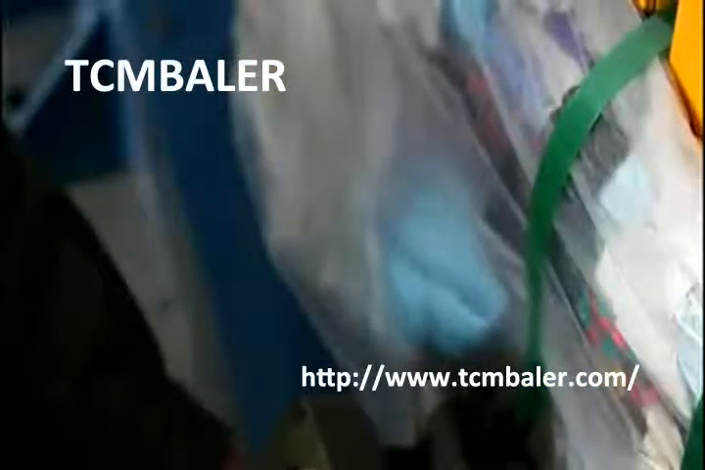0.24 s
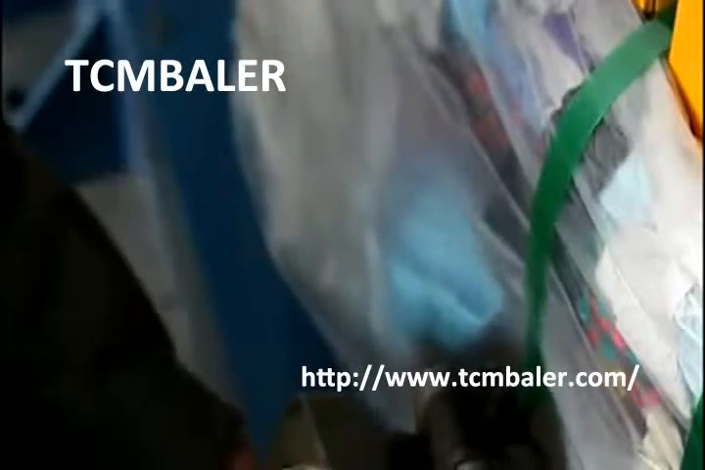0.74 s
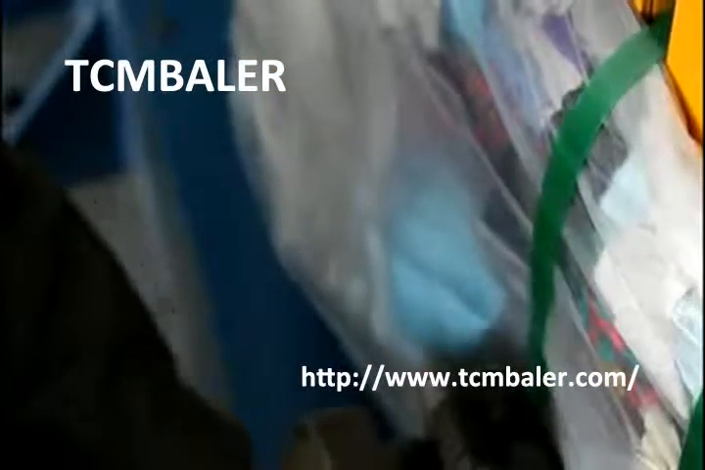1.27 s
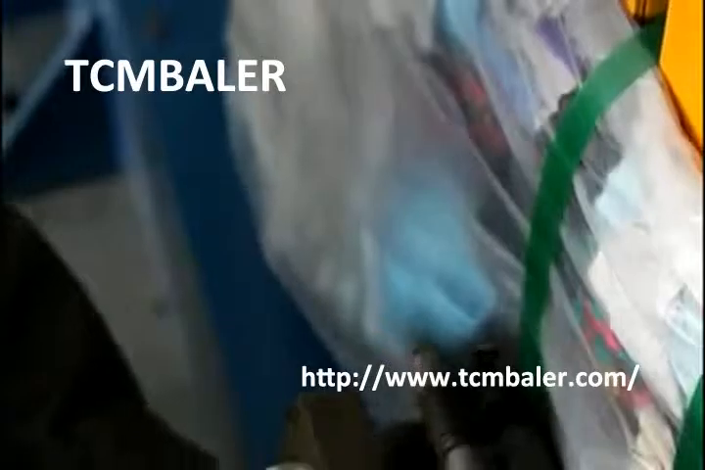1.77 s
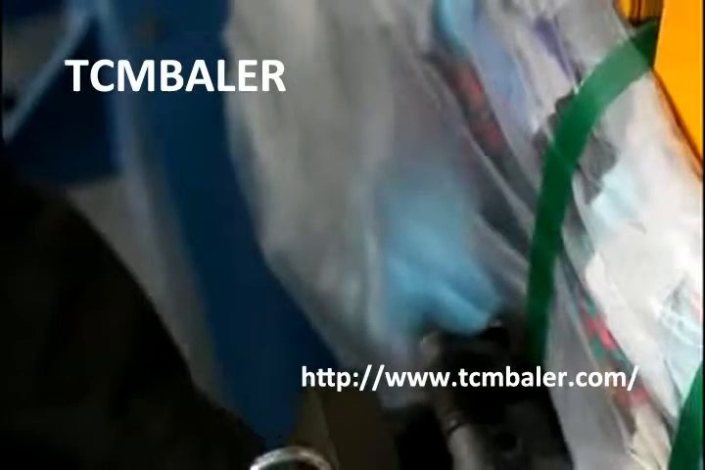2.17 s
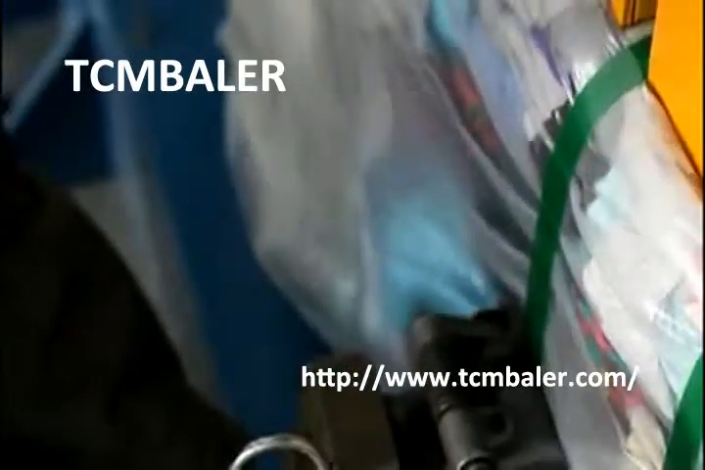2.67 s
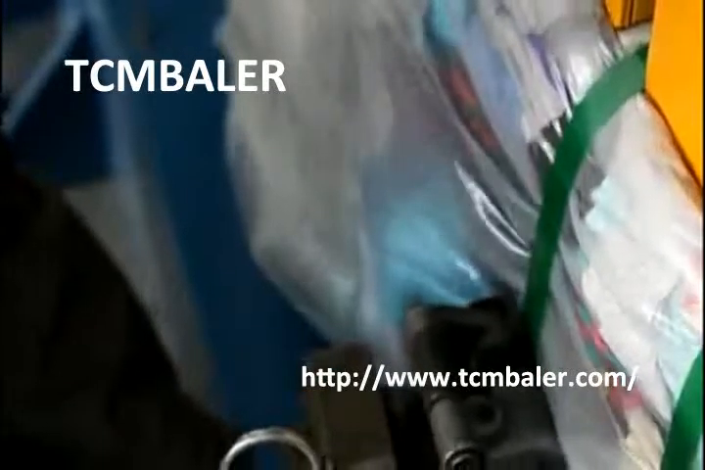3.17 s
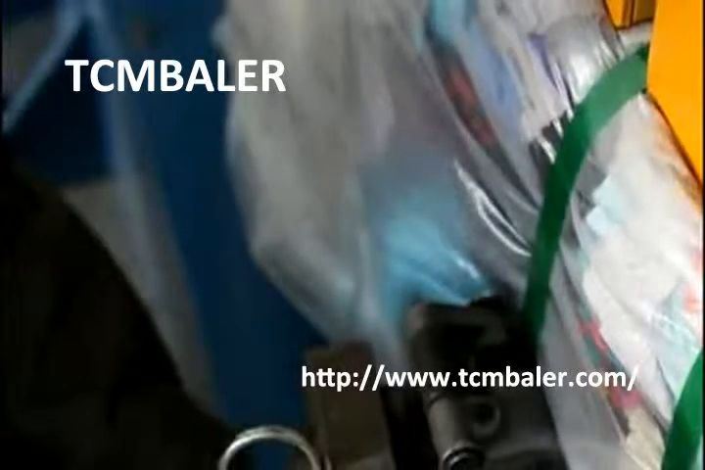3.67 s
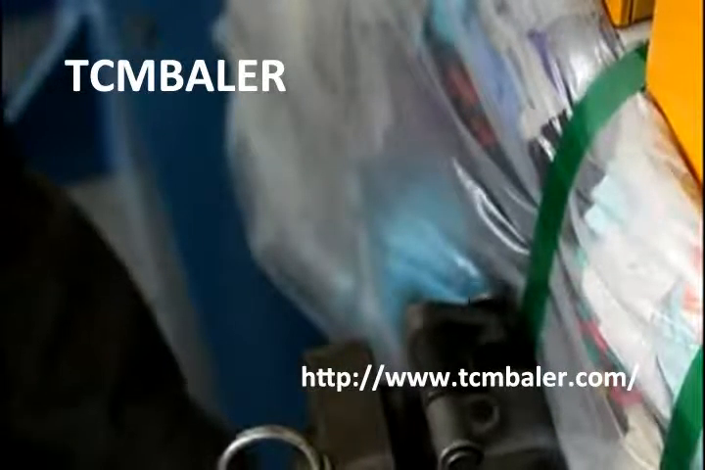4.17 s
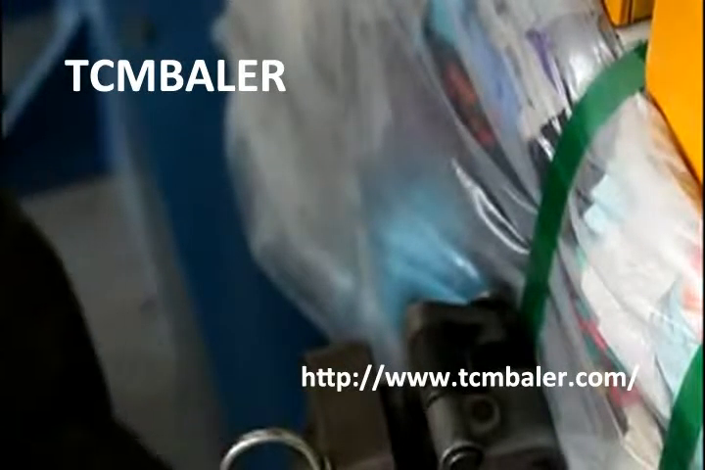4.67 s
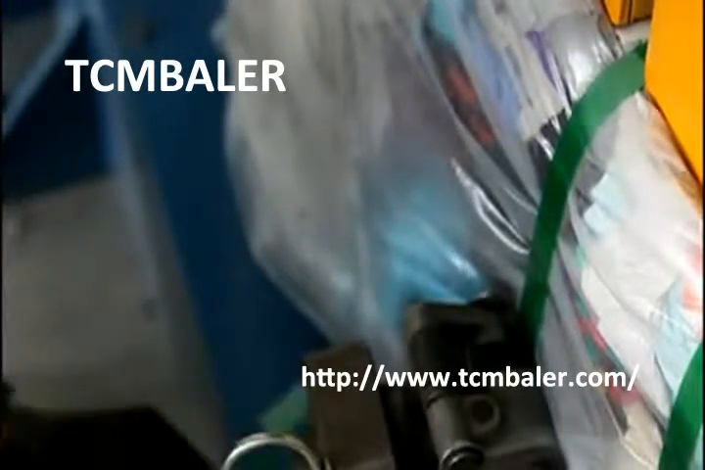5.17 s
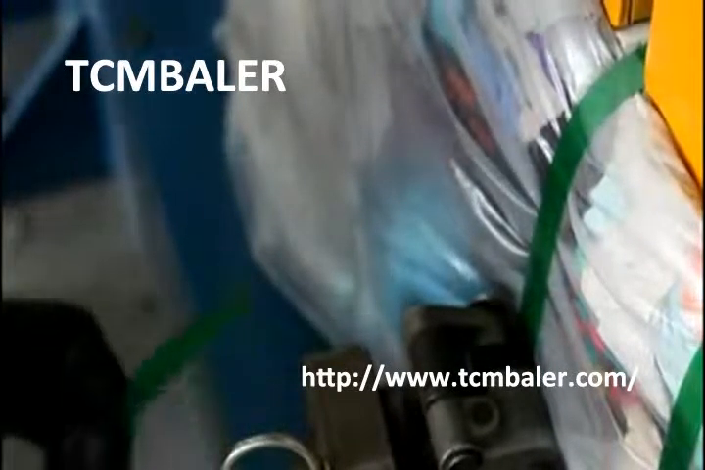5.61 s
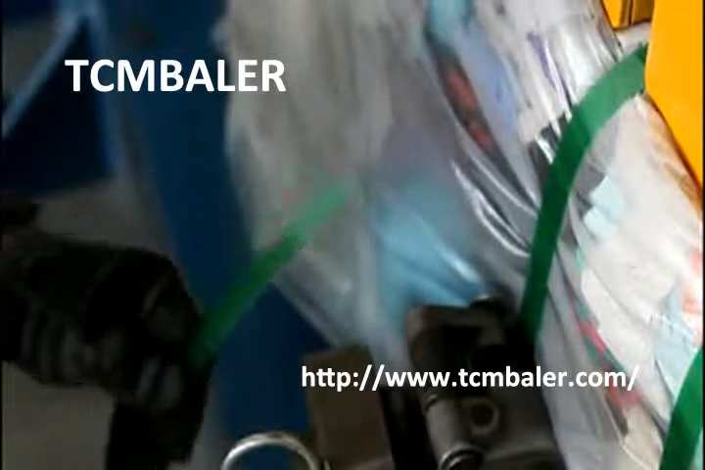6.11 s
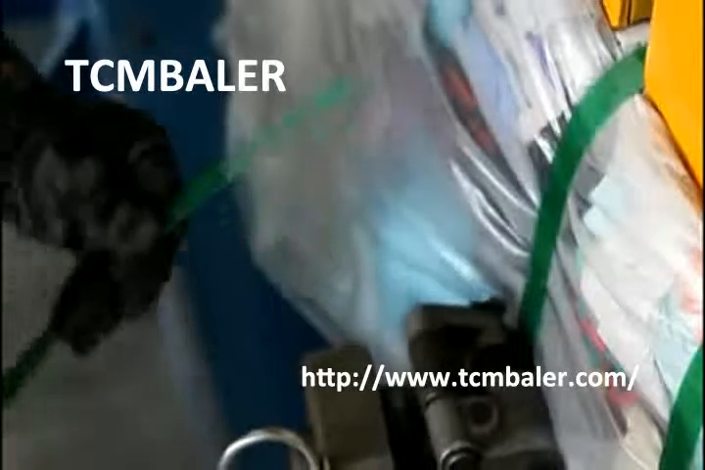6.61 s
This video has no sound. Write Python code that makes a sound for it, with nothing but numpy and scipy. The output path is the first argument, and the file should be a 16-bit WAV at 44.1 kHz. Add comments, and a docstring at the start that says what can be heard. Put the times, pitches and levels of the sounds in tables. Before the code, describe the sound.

A short rush of air and a clack start a handheld pneumatic strapping tool, close to the microphone in a factory. Its motor whines in a strong hiss of exhaust, sinking in pitch as the plastic strap tightens round a bale, until it stalls. After a second of softer rushing air, a lever clacks sharply and the tool's friction welder sets in with a harsh, rasping buzz that lasts to the end.

```python
"""A short rush of air and a clack, then a motor whines close by in a jet of exhaust air: a handheld
pneumatic strapping tool is closing a plastic strap round a bale in a factory. Each vane of the motor
releases a puff, so the pitch follows the rotor, sinking as the strap tightens until it stalls.
A lever clacks and the friction welder buzzes: its shoe knocks to and fro, a periodic force that
excites the housing and the clamped strap. Turbulent air rushes behind it all."""
import sys
import numpy as np
from scipy import signal
from scipy.fft import rfft, irfft
from scipy.io import wavfile
from scipy.ndimage import uniform_filter1d

SR = 44100
rng = np.random.default_rng(int(sys.argv[2]) if len(sys.argv) > 2 else 0)


def to_wav(s):
    """Save 16-bit WAV."""
    ch = np.atleast_2d(s).T  # columns
    pcm = np.round(np.clip(ch, -1, 1) * 32767)  # PCM
    wavfile.write(sys.argv[1], SR, pcm.astype(np.int16))


N = 302085
TIME = np.arange(N) / SR
BINS = np.fft.rfftfreq(N, 1 / SR)


# Rotor speed under the growing load: time_s, vane_rate_hz
LOADED_SPEED = [(0.56, 881.1), (1.02, 876.2), (1.57, 855.1), (1.63, 859.0), (2.13, 834.7), (2.67, 824.8),
                (3.02, 812.0), (3.33, 750.7), (3.46, 679.8)]
MOTOR_START_S, SPIN_UP_S, STALL_S = .444, .023, 3.46

def tension_motor():
    """Siren principle: vanes chop the air into puffs, whose rate sets the pitch and falls with load."""
    running_s = np.maximum(TIME - MOTOR_START_S, 0)
    vane_hz = curve(LOADED_SPEED) * (1 - np.exp(-running_s / SPIN_UP_S))
    angle = 2 * np.pi * np.cumsum(vane_hz * (1 + .0018 * wander(73))) / SR
    return reverberate(vane_whine(vane_hz, angle) + exhaust_jet(angle), t60_s=.5, wet_db=-18)


# Strong partials of the puffs, ahead of the port: harmonic, level_db
STRONG_PARTIALS = [(1, -44.5), (2, -49.5), (3, -50), (4, -39), (5, -42.5), (6, -48.5), (7, -43.5)]
# Weak upper partials: harmonic, relative_level_db
WEAK_PARTIALS = [(8, 8.5), (9, -11), (10, -8.5)]
# Resonances and dips of the exhaust port: centre_hz, width_hz, gain_db
PORT_RESONANCES = [(760, 220, 12.5), (1507, 82, 13), (1621, 45, -10), (1683, 234, 14.5), (2555, 13, 9.1),
                   (2600, 15, 6.5), (3316, 130, 9.5), (3354, 45, -14.5), (3440, 25, -17), (3830, 115, -11),
                   (4201, 68, 8), (4304, 61, 8.5), (4406, 43, 9), (5150, 79, 8), (5490, 90, 12),
                   (6095, 250, 10)]
# Resonances of the motor casing: centre_hz, width_hz, gain_db
CASING_RESONANCES = [(7570, 82, 20.5), (7870, 280, 16.5), (6120, 180, 7)]

def vane_whine(vane_hz, angle):
    """Source and filter: harmonics swell and fade as they glide through fixed resonances."""
    near_stall = np.exp(np.minimum(TIME - STALL_S, 0) / .16)
    stutter_db, dulling_db_per_harmonic = 7, 1.8

    def partial(k):
        """Amplitude modulation: turbulence shakes high partials most; near stall they stutter and fade."""
        strain_db = near_stall * (k > 1) * (stutter_db * wander(19) - dulling_db_per_harmonic * k)
        flutter_db = (1.12 + .17 * k) * wander(41)
        return amp(flutter_db + strain_db) * np.cos(k * angle + 2 * np.pi * rng.random())

    strong = sum(amp(db) * resonance(PORT_RESONANCES, k * vane_hz) * partial(k)
                 for k, db in STRONG_PARTIALS)
    weak = sum(amp(db + 2 * wander(7.5)) * partial(k) for k, db in WEAK_PARTIALS)
    weak = shaped(weak, resonance(CASING_RESONANCES))
    return (np.sqrt(2) * strong + amp(-39) * weak) * gate(.453, STALL_S, .075, .022)


# Spectrum of exhaust air: frequency_hz, gain_db
JET_SPECTRUM = [(400, -25.5), (1300, -22), (2200, -16.5), (2800, -12), (3300, -9), (3900, -7), (4700, -7),
                (5500, -3.5), (6200, 1), (7000, 1), (7700, -1), (8200, -15), (9000, -15.5), (10200, -25.5)]

def exhaust_jet(angle):
    """Jet noise: turbulence throbs at the vane rate and surges until the rotor is up to speed."""
    surge_db = 4 * np.clip((.53 - TIME) / .015, 0, 1)
    puffs = rng.standard_normal(N) * (1 + .23 * np.cos(angle)) * amp(.59 * wander(60))
    muffler = resonance([(3030, 57, 2.3), (7380, 250, 3), (8340, 95, 10.1), (9300, 40, 8.7)])
    jet = shaped(puffs, colour(JET_SPECTRUM) * muffler)
    return jet * amp(-28.5 + surge_db) * gate(.41, 3.455, .019, .011)


# Speed of the welding shoe: time_s, stroke_rate_hz
SHOE_SPEED = [(4.36, 102.8), (4.41, 104.4), (4.45, 102.9), (4.6, 113.5), (4.92, 119.9), (5.02, 120.8),
              (5.24, 127.4), (5.56, 131.0), (5.7, 131.6), (6.03, 125.3), (6.59, 125.5), (6.75, 125.0)]
# Unevenness of the strokes, easing as the strap melts: time_s, roughness_fraction
SHOE_ROUGHNESS = [(4.34, .74), (4.6, .58), (5.08, .52), (5.35, .28), (5.8, .27), (5.97, .48), (6.3, .25),
                  (6.85, .27)]
WELD_START_S = 4.34

def friction_welder():
    """Forced vibration: a reciprocating shoe drives strap and housing, hardest on the cold strap."""
    stroke_hz, roughness = curve(SHOE_SPEED), curve(SHOE_ROUGHNESS)
    coldness = np.exp(-np.maximum(TIME - WELD_START_S, 0) / .24)
    force = amp(-26 + 2.5 * coldness)
    # A dry strap grabs, so the strokes come unevenly.
    angle = 2 * np.pi * np.cumsum(stroke_hz) / SR + .021 * roughness * wander(90)
    # Dispersion: paths through the metal delay each partial differently and smear the knock.
    harmonics = np.arange(1, 84)
    phases = np.cumsum(1.7 * rng.standard_normal(len(harmonics))) - .024 * harmonics ** 2
    singing, singing_power = strap_singing(stroke_hz, angle, phases)
    # Knocks and rasp share the rest of the stroke's power.
    remainder = np.sqrt(np.maximum(force ** 2 - singing_power, force ** 2 / 10))
    buzz = remainder * np.sqrt(1 - roughness ** 2) * shoe_knocks(angle, harmonics, phases)
    rasp = remainder * roughness * strap_rasp(angle)
    strokes = (singing + buzz) * amp(1.07 * roughness * wander(120))
    return reverberate(strokes + rasp, t60_s=.2, wet_db=-18) * gate(WELD_START_S, 7, .014, .01)


# Stroke partials that drive the strap: harmonic, level_db
SINGING_PARTIALS = [(9, -46.5), (13, -44), (15, -42), (21, -44), (23, -44), (25, -46), (27, -44),
                    (29, -44.5)]
# Resonances and dips of the clamped strap: centre_hz, width_hz, gain_db
STRAP_RESONANCES = [(1034, 232, 4.5), (1426, 36, 8.5), (1632, 23, -5.2), (1750, 386, 7.5), (1942, 42, -3.6),
                    (2667, 192, 9.3), (2886, 21, 3.7), (3012, 240, -5.2), (3164, 135, 7.2),
                    (3288, 54, -4.1), (3349, 240, 4.4), (3650, 39, -7.3), (3749, 69, 9.2)]
# Passing resonance late in the weld: peak_s, spread_s, centre_hz, width_hz, gain_db
LATE_RESONANCE = (6.4, .25, 2740, 420, 5.5)
MELT_S, MELT_DB_PER_S = 6.52, 11

def strap_singing(stroke_hz, angle, phases):
    """Resonance: a few partials sing out as they meet the strap's modes, and fade once it melts."""
    peak_s, spread_s, centre_hz, width_hz, gain_db = LATE_RESONANCE
    late_mode = [(centre_hz, width_hz, gain_db * np.exp(-((TIME - peak_s) / spread_s) ** 2))]
    singing = power = 0
    for k, db in SINGING_PARTIALS:
        strength = amp(db) * resonance(STRAP_RESONANCES, k * stroke_hz)
        singing += strength * resonance(late_mode, k * stroke_hz) * np.cos(k * angle + phases[k - 1])
        power += strength ** 2
    melt_fade = amp(-MELT_DB_PER_S * np.maximum(TIME - MELT_S, 0))
    return np.sqrt(2) * singing * melt_fade, power


# Spectrum of the knocks: frequency_hz, gain_db
KNOCK_SPECTRUM = [(125, -34), (375, -10), (630, 1), (880, -1), (1150, 3), (1900, 3), (2700, 3), (3500, .5),
                  (4700, -.5), (6000, -2.5), (7550, -3.5), (8000, -12), (9500, -20), (10500, -32)]
# Resonances and dips of the tool's housing: centre_hz, width_hz, gain_db
HOUSING_RESONANCES = [(1300, 110, -6), (1430, 90, 4), (1780, 200, 7), (2170, 190, -9), (2450, 120, 3),
                      (2790, 60, -4), (3000, 70, -4), (3130, 70, 6), (3420, 70, 7), (3510, 60, 4),
                      (3640, 80, -6), (3745, 55, 3), (4060, 160, 4), (4260, 90, -5), (4530, 80, 7),
                      (4660, 70, 5), (4865, 90, 10), (5100, 150, -4), (5260, 60, 4), (6150, 140, 5),
                      (6770, 100, 5), (7580, 110, 6)]

def shoe_knocks(angle, harmonics, phases):
    """Half-wave symmetry: opposite knocks at the two ends of a stroke favour odd harmonics."""
    # The contact shifts as the strap softens, so the upper partials swell and fade.
    drift_times_s = np.linspace(4.3, 6.9, num=14)
    depth_db = 3.2 * np.minimum(harmonics / 40, 1)
    drifts_db = depth_db[:, None] * rng.standard_normal((len(harmonics), len(drift_times_s)))
    knocks = np.zeros(N)
    for k, phase, drift_db in zip(harmonics, phases, drifts_db):
        if k not in dict(SINGING_PARTIALS):
            # The two ends differ in fine detail, which fills in the high even harmonics.
            weight = 1 if k % 2 else .36 + .64 / (1 + (25 / k) ** 10)
            knocks += weight * np.interp(TIME, drift_times_s, amp(drift_db)) * np.cos(k * angle + phase)
    buzz = shaped(knocks, colour(KNOCK_SPECTRUM) * resonance(HOUSING_RESONANCES))
    running_rms = np.sqrt(uniform_filter1d(buzz ** 2, size=6000))
    return buzz / running_rms


# Spectrum of the rubbing strap: frequency_hz, gain_db
RASP_SPECTRUM = [(290, -35), (600, -16), (1100, -8.5), (1700, -1), (2200, -5), (2700, -1.5), (3600, -3),
                 (4700, 2.5), (6000, 1), (7500, -7.5), (8000, -14), (9200, -15), (10200, -26)]

def strap_rasp(angle):
    """Sliding friction: broadband noise pulses in step with the strokes."""
    rubbing = rng.standard_normal(N) * (1 + .26 * np.cos(angle) + .18 * np.cos(2 * angle))
    modes = resonance([(1190, 440, 4.8), (1860, 71, 13), (2610, 400, 3.6), (4470, 300, 1)])
    return shaped(rubbing, colour(RASP_SPECTRUM) * modes)


def welder_exhaust():
    """Jet noise: spent air leaves the welder's motor in a fluttering hiss."""
    air = shaped(rng.standard_normal(N), colour(JET_SPECTRUM)) * amp(4.1 * wander(40))
    return amp(-40) * air * gate(WELD_START_S, 7, .014, .01)


# Blows of the levers and valves: start_s, level_db, decay_s
LEVER_BLOWS = [(.427, -21, .008), (.456, -26, .012), (4.3145, -27, .012), (4.324, -24, .012),
               (4.330, -22, .005), (4.3343, -12, .0009), (4.3354, -11.5, .0009), (4.340, -25, .006)]
# Spectrum of the rattling metal: frequency_hz, gain_db
METAL_SPECTRUM = [(35, -44), (60, -44), (773, 2.5), (1680, -4), (2080, -15), (2260, -44), (3400, -1.5),
                  (3790, -6.5), (4800, 2.5), (5460, -6), (6080, 0), (7380, -5), (8100, -10), (10200, -34),
                  (13200, -58), (22000, -120)]

def lever_clacks():
    """Impact excitation: each blow of a lever or valve starts a rattle that decays exponentially."""
    envelope = sum(amp(db) * (TIME >= start_s) * np.exp(-abs(TIME - start_s) / decay_s)
                   for start_s, db, decay_s in LEVER_BLOWS)
    modes = resonance([(3420, 350, 5.1), (4960, 200, 1.7)])
    metal = shaped(rng.standard_normal(N), colour(METAL_SPECTRUM) * modes)
    return reverberate(envelope * metal, t60_s=.1, wet_db=-12)


# Level of the background rush, dipping while the motor and welder sound: time_s, relative_level_db
BACKGROUND_LEVEL = [(0, -62), (0.02, -40.5), (0.41, -40.5), (0.53, -59.5), (1.53, -60.5), (1.65, -53.3),
                    (2.7, -50.5), (3.4, -49), (3.48, -46.5), (3.88, -46.5), (4.03, -43), (4.32, -40),
                    (4.4, -43.8), (5.3, -47.0), (6.85, -47.5)]
# Its spectrum: frequency_hz, gain_db
BACKGROUND_SPECTRUM = [(15, -68), (25, -26), (82, -5), (153, -6.5), (217, -1.5), (474, -5), (745, -3.5),
                       (2310, -7.5), (3370, -5.5), (3820, -9), (4910, -6), (5570, -12), (6980, -8.5),
                       (9440, -32), (10200, -51), (13200, -81), (22000, -120)]
# Low hum of the room and hollow peaks of the rushing air: centre_hz, width_hz, gain_db
BACKGROUND_PEAKS = [(80, 9.1, 1.8), (95, 6.8, 3), (382.6, 7.5, 7.4), (903, 71, 4.2), (3415, 67, 9),
                    (5000, 150, 1.7), (6770, 170, 3.3), (7100, 180, 3.8)]

def background_rush():
    """Turbulent flow: air rushes over the room's low hum; a leak hisses before the motor starts."""
    spectrum = colour(BACKGROUND_SPECTRUM) * resonance(BACKGROUND_PEAKS)
    high_pass = BINS ** 2 / (BINS ** 2 + 2800 ** 2)
    rush = shaped(rng.standard_normal(N), spectrum) * amp(curve(BACKGROUND_LEVEL) + 11)
    leak = shaped(rng.standard_normal(N), spectrum * high_pass)
    return rush + amp(-27) * leak * gate(.013, .44, .013, .032)


def amp(db):
    """Amplitude ratio of a level in decibels."""
    return 10 ** (np.asarray(db) / 20)


def curve(rows):
    """Linear interpolation of (time_s, value) rows at every sample."""
    return np.interp(TIME, *np.transpose(rows))


def colour(points):
    """Spectral envelope through (frequency_hz, gain_db) points, on a logarithmic frequency axis."""
    hz, db = np.transpose(points)
    return amp(np.interp(np.log(BINS + 1), np.log(hz + 1), db))


def resonance(peaks, at_hz=BINS):
    """Frequency response of (centre_hz, width_hz, gain_db) peaks and dips on a flat base."""
    return amp(sum(db / (1 + (2 * (at_hz - hz) / width) ** 2) for hz, width, db in peaks))


def shaped(x, gain):
    """Linear filtering by a gain per frequency, scaled to rms 1."""
    filtered = irfft(rfft(x) * gain, N)
    return filtered / np.sqrt(np.mean(filtered ** 2) + 1e-20)


def wander(cutoff_hz):
    """Random fluctuation: low-pass noise of rms 1."""
    return shaped(rng.standard_normal(N), 1 / (1 + (BINS / cutoff_hz) ** 4))


def gate(start_s, stop_s, rise_s, fall_s):
    """Trapezoidal envelope of a valve that opens and shuts."""
    return np.clip((TIME - start_s) / rise_s, 0, 1) * np.clip((stop_s - TIME) / fall_s, 0, 1)


def reverberate(x, t60_s, wet_db):
    """Reverberation: diffuse reflections follow the direct sound and decay exponentially."""
    t = TIME[:SR // 2]
    reflections = rng.standard_normal(len(t)) * amp(-60 * t / t60_s) * (t > .002)
    return x + amp(wet_db) * signal.oaconvolve(x, reflections / np.linalg.norm(reflections))[:N]


def scene():
    """Superposition: the pressures of all sources add at one microphone."""
    return (background_rush() + tension_motor() + friction_welder()
            + welder_exhaust() + lever_clacks())[None]


def record(dry):
    """Frequency response: a small microphone peaks near 8 kHz, then falls away to the band limit."""
    microphone = colour([(20, -5.5), (7600, 1), (8100, 4.5), (9300, 3), (10300, -1)])
    heard = irfft(rfft(dry[0]) * microphone, N)
    low_pass = signal.firwin(301, cutoff=10400, window=("kaiser", 8), fs=SR)
    return signal.oaconvolve(heard, low_pass, "same")[None]


dry = scene()
out = record(dry)
to_wav(out)
```